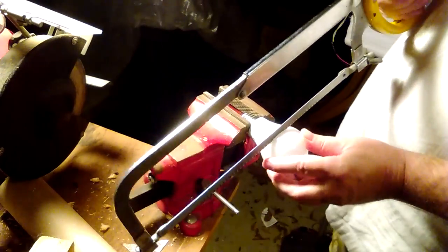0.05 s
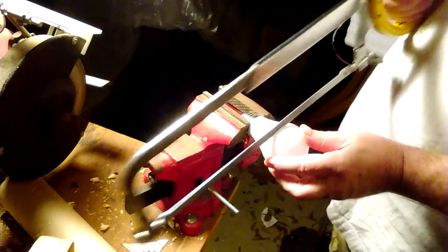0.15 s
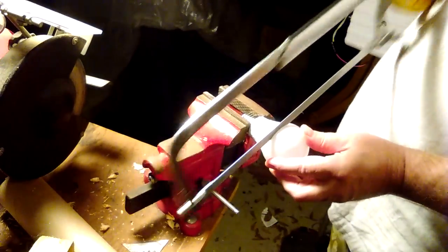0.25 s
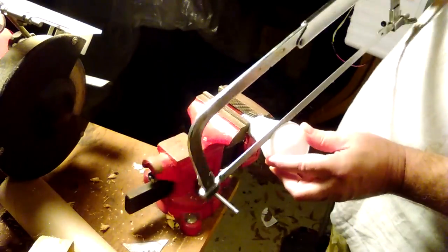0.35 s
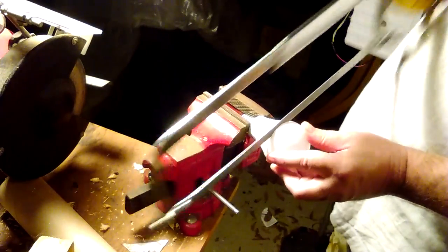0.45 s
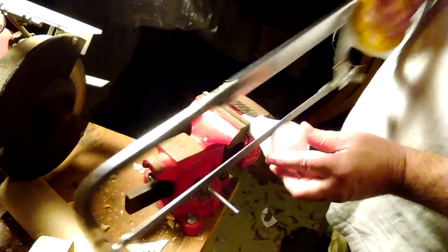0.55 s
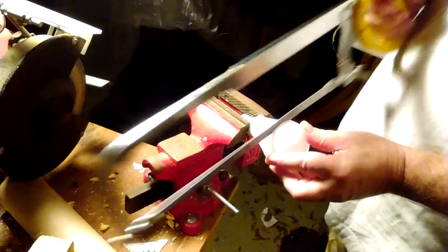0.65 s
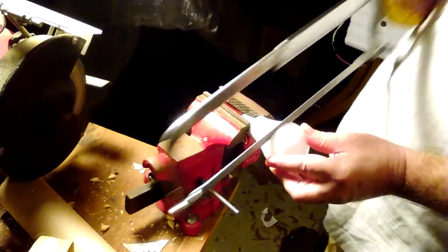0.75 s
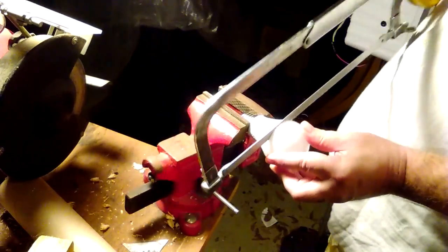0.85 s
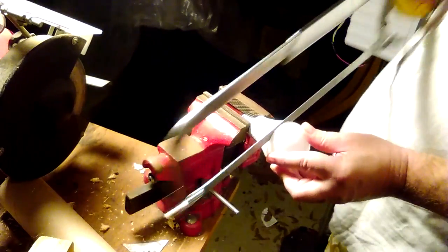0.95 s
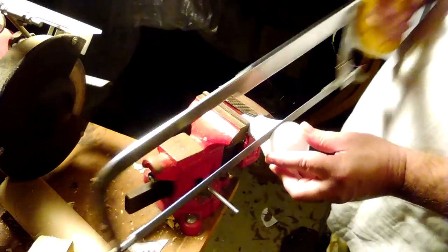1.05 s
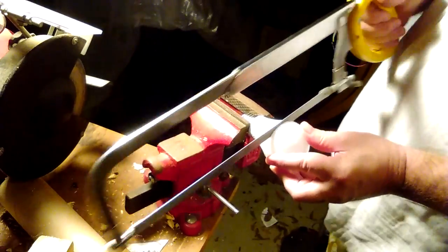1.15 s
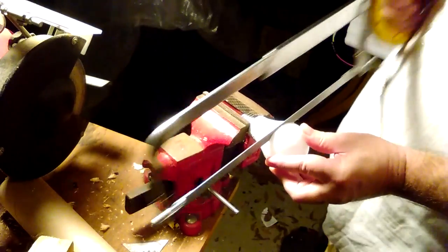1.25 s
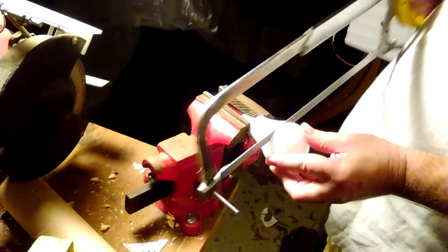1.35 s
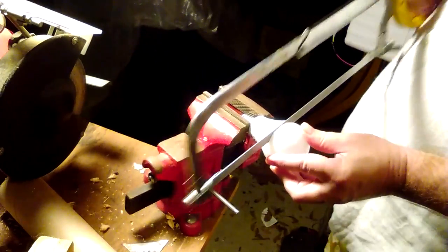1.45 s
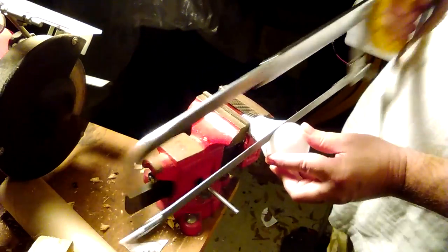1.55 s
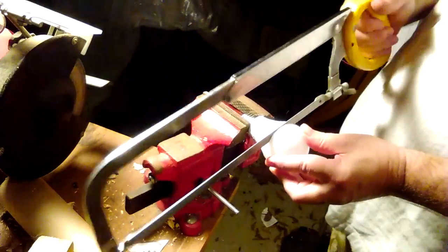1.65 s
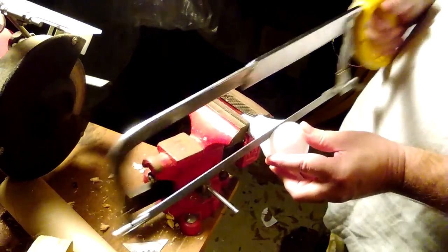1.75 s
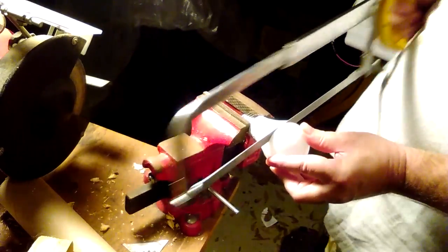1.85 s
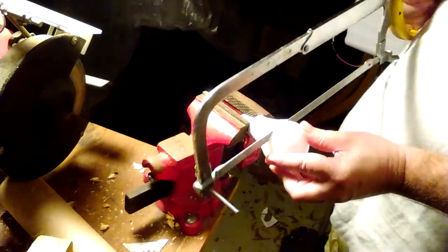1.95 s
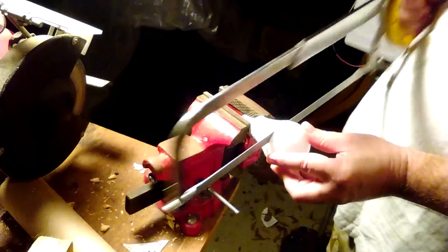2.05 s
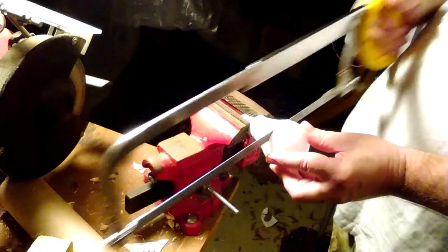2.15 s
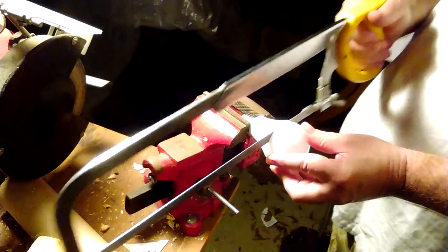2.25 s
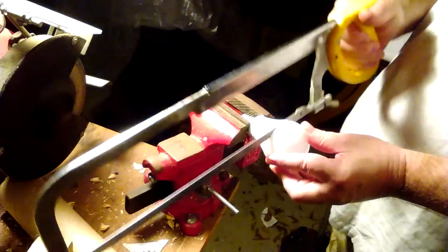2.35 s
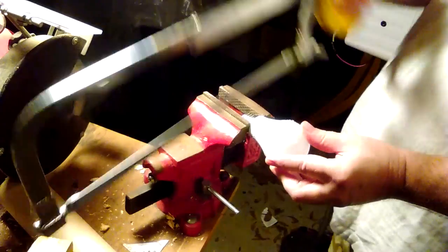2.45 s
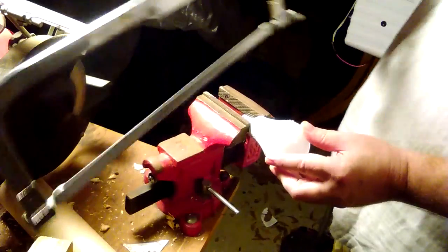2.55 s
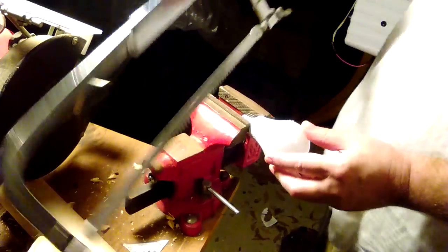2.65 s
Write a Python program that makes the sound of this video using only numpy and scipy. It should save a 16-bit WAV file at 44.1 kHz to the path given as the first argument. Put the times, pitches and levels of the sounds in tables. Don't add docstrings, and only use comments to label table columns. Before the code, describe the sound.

A hand hacksaw rasps back and forth through plastic in a vise, snags, then breaks free.

```python
import sys
import numpy as np
from scipy import signal
from scipy.fft import rfft, irfft, next_fast_len
from scipy.io import wavfile

SR = 44100
rng = np.random.default_rng(int(sys.argv[2]) if len(sys.argv) > 2 else 0)


def file_out(sig):
    cols = np.atleast_2d(sig).T
    lim = np.clip(cols, -1, 1)
    pcm = np.round(lim * 32767).astype(np.int16)
    wavfile.write(sys.argv[1], SR, pcm)


def volts_from_decibels(level):
    exponent = np.asarray(level, float) / 20
    return 10 ** exponent


N = 119070

# (frequency [Hz], level [dB])
HUM_SPECTRUM = [(12, -30), (20, -3), (72, 3.5), (147, -33), (235, -14.5), (865, -25), (6720, -27),
                (13800, -43), (15000, -68)]
HUM_DB, WHINE_HZ, WHINE_DB = -40, 1851, -60

# (time [s], peak [dB])
BENCH_THUDS = [(0.028, -41), (0.209, -52), (0.361, -15), (0.469, -17.5), (0.719, -22), (0.949, -13.5),
               (1.229, -19), (1.459, -17.5), (1.769, -13), (2.049, -14), (2.299, -20.5), (2.519, -43.5)]
THUD_S, THUD_CUT_HZ, SHAKE_DB = 0.051, 157, -36.5

# (start [s], blade hiss [dB], frame drive [dB], top tooth rate [Hz], drag left at turn [dB])
STROKES = [
    (.186, -12, -9.5, 520.3, -36.5),
    (0.426, -11, -17, 637.8, -19.5),
    (.662, -10.5, -11.5, 758, -21.5),
    (0.954, -10, -14, 882, -9.5),
    (1.195, -8, -13, 962, -28.5),
    (1.469, -9.5, -12.5, 706.2, -15.5),
    (1.752, -9, -15, 1078, -25),
    (1.975, -12, -16, 668.1, 2.5),
    (2.085, -8.5, -12.5, 679.4, -3),
    (2.295, -24.5, -20.5, 477.5, -6.5),
]
LAST_END_S, LAST_DRAG_DB = 2.40, -34.5
SPEED_SHAPE, SPEED_SKEW, HISS_SKEW = 0.6, 0.9, 0.74
HISS_POWER = 2.71
LOOSE_ABOVE_HZ, LOOSE_GAIN, SLOW_LOOSENESS = 750, 1.8, 1.5
TOOTH_JITTER, TOOTH_SPREAD_DB, RATE_WOBBLE = 0.095, 2.0, 0.045
CHIPS_PER_TOOTH, CHIP_SPREAD_DB, GATE_DEPTH, SURGE_DB = 4.0, 2, 0.39, 1.5

# (frequency [Hz], width [Hz], level [dB])
FRAME_MODES = [(188, 39, -8), (372, 38, -1.5), (415, 52, -4), (492, 30, 4), (594.3, 28, 2), (661, 34, 1.5),
               (723.5, 20.8, 0), (761, 10, -1), (971.4, 61, -6), (1088, 34, -6), (1257, 110, -10.5),
               (1589, 130, -14.5), (1860, 29, -11.5)]
# (frequency [Hz], width [Hz], level [dB])
BLADE_MODES = [(3300, 250, -19), (4063, 23.5, -2), (4672, 360, -2), (5130, 144, -1.5), (5230, 86, -12.5),
               (6010, 75, 2), (6603, 316, 4), (6637, 94, -2.5), (6840, 250, -3), (7290, 297, -3.5),
               (7740, 900, -12.5), (8260, 100, -17.5), (11340, 690, -30.5)]
BLADE_CUT_HZ, PATCH_DB = 10930, 3
# (frequency [Hz], level per Hz [dB])
RASP_SPECTRUM = [(470, -17), (800, 2), (2800, -9), (4700, -5.5), (5660, 3.5), (6570, -5), (9410, -29.5),
                 (13600, -26), (15400, -51)]
RASP_DB, RASP_FOLLOWS = -4.5, 0.31
# (time [s], peak [dB], decay length [s])
SNAGS = [(0.019, -27.5, 0.0036), (0.0316, -28.5, 0.0048), (0.067, -35, 0.0064), (.186, -31, 0.0026),
         (.191, -21.5, .003), (.201, -17, .004), (1.7472, -10, 0.0027), (1.96, -10, .002),
         (2.085, -10, .003), (2.281, -23, .003), (2.325, -13.5, 0.0035), (2.3504, -16, 0.0029),
         (2.409, -20, 0.006), (2.417, -27, 0.036), (2.624, -32, 0.0027), (2.6905, -51, 0.003)]
SNAG_TRIM_DB, SNAG_CUT_HZ, SNAG_FRAME_DB = 1, 10000, -8

# (frequency [Hz], level [dB], T60 [s])
PING_PARTIALS = [(6350, -12, 0.34), (6826, 0, 0.095), (7830, -2.5, 0.11), (7908, -23.5, 0.12),
                 (8370, -3, 0.087), (8500, -13, 0.047)]
PING_S, PING_DB, PING_RISE_S = 2.3675, -14, 0.0019

# (frequency [Hz], width [Hz], level [dB])
FREED_MODES = [(1390, 420, -2), (1830, 180, -4), (3340, 29, -4), (3830, 69, -6), (4400, 1170, 2.5),
               (5270, 410, 5), (6200, 1430, 5), (7750, 730, 5.5), (10930, 1400, -42)]
BREAK_S, BREAK_LENGTH_S, BREAK_DB = 2.431, 0.011, -9
BREAK_TAIL_DB, BREAK_T60_S = -17, 0.31
# (frequency [Hz], level [dB], T60 [s])
AFTER_PARTIALS = [(3580, -41, .9), (4020, -43, .6), (1990, -46, .7), (7700, -40, .4), (4500, -44, .5)]

GARAGE_T60_S, WET_DB, WALL_CUT_HZ = 0.38, -21, 5300

LIMIT_DB, LIMIT_SHARE, LIMIT_S = -7.5, 0.74, 0.018
CUTOFF_HZ, CEILING, KNEE = 14000, 1.0, 18
# (frequency [Hz], share of cells replaced [0-1])
TREBLE_FILL = [(4000, 0.0072), (5000, .06), (6500, 0.3), (8000, .55), (11000, 0.47), (13500, 0.68),
               (14200, 0.29)]
FILL_BAND_HZ, STEADY_DB, TONAL_CREST = 700, 6, 9
TOP_HZ, TOP_SHARE, TOP_DB = 14300, 0.25, -18


def rms_one(x):
    return x / np.sqrt(np.mean(x ** 2) + 1e-20)


def drift(rate_hz):
    r = np.exp(-2 * np.pi * rate_hz / SR)
    return rms_one(signal.lfilter([1], [1, -2 * r, r * r], rng.standard_normal(N + SR))[SR:])


def lowpass(x, order, cut_hz):
    return signal.sosfilt(signal.butter(order, cut_hz, fs=SR, output="sos"), x)


def coloured(x, spectrum):
    hz, db = np.transpose(spectrum)
    f = np.maximum(np.fft.rfftfreq(N, 1 / SR), 1)
    return irfft(rfft(x) * volts_from_decibels(np.interp(np.log(f), np.log(hz), db)), N)


def resonances(x, modes, patch_db=0):
    out, signs = 0, rng.choice([-1, 1], (3, N))
    for k, (hz, width_hz, db) in enumerate(modes):
        r = np.exp(-np.pi * width_hz / SR)
        if patch_db:
            gain = signs[k % 3] * volts_from_decibels(db + patch_db * drift(8.4))
        else:
            gain = (-1) ** k * volts_from_decibels(db)
        b = [(1 - r * r) / 2, 0, (r * r - 1) / 2]
        a = [1, -2 * r * np.cos(2 * np.pi * hz / SR), r * r]
        out = out + signal.lfilter(b, a, gain * x + 1e-18)
    return out


def struck(x, modes, patch_db=0):
    return resonances(x, modes, patch_db) / np.std(resonances(rng.standard_normal(N), modes))


def burst(start_s, db, length_s):
    t = np.arange(N) / SR - start_s
    return volts_from_decibels(db) * (t >= 0) * np.exp(-np.maximum(t, 0) / length_s)


def partials(start_s, table, flutter_db, flutter_hz):
    t = np.maximum(np.arange(N) / SR - start_s, 0)
    out = 0
    for hz, db, t60_s in table:
        level_db = db - 60 * t / t60_s + flutter_db * drift(flutter_hz)
        out = out + volts_from_decibels(level_db) * np.sin(2 * np.pi * hz * t)
    return out


def hum():
    whine = rms_one(resonances(rng.standard_normal(N), [(WHINE_HZ, 12, 0)]))
    return volts_from_decibels(HUM_DB) * rms_one(coloured(rng.standard_normal(N), HUM_SPECTRUM)) + volts_from_decibels(WHINE_DB) * whine


def bench():
    t = np.arange(N) / SR
    lumps = sum(volts_from_decibels(db - 10.5) * np.exp(-((t - s) / THUD_S) ** 2) for s, db in BENCH_THUDS)
    band = signal.butter(2, [30, THUD_CUT_HZ], "band", fs=SR, output="sos")
    low = signal.sosfilt(band, rng.standard_normal(N + SR))[SR:]
    return (volts_from_decibels(SHAKE_DB) + lumps) * rms_one(low)


def snag_noise():
    return rng.standard_normal(N) * volts_from_decibels(SNAG_TRIM_DB) * sum(burst(*row) for row in SNAGS)


def motion():
    t, out = np.arange(N) / SR, np.zeros((4, N))
    following = [*STROKES[1:], (LAST_END_S, 0, 0, 0, LAST_DRAG_DB)]
    for (start_s, hiss_db, drive_db, tooth_hz, drag_db), (end_s, *_, next_db) in zip(STROKES, following):
        u = np.clip((t - start_s) / (end_s - start_s), 0, 1)
        speed = np.abs(np.sin(np.pi * u ** SPEED_SKEW)) ** SPEED_SHAPE
        rub = np.abs(np.sin(np.pi * u ** HISS_SKEW)) ** SPEED_SHAPE
        rest = np.minimum(volts_from_decibels(drag_db + (next_db - drag_db) * u), 1)
        moving = rest + (1 - rest) * speed
        loose = (LOOSE_GAIN if tooth_hz > LOOSE_ABOVE_HZ else 1) * (1 + SLOW_LOOSENESS * (1 - speed))
        hiss = volts_from_decibels(hiss_db) * (rest + (1 - rest) * rub ** HISS_POWER)
        stroke = np.array([tooth_hz * moving, loose, hiss, volts_from_decibels(drive_db) * moving])
        out += (t >= start_s) * (t < end_s) * stroke
    return out


def frame_ring(phase, loose, drive):
    tooth = np.diff(np.floor(np.maximum.accumulate(phase)), prepend=0) > 0
    bites = tooth * volts_from_decibels(TOOTH_SPREAD_DB * loose * np.clip(rng.standard_normal(N), -3, 1.5))
    ring = resonances(bites * drive * volts_from_decibels(SURGE_DB * drift(28.5)), FRAME_MODES)
    return rms_one(ring) * np.sqrt(np.mean(drive ** 2))


def chip_push(phase, rate_hz, hiss):
    sizes = volts_from_decibels(CHIP_SPREAD_DB * np.minimum(rng.exponential(1, N), 5)) * rng.choice([-1, 1], N)
    hits = rng.random(N) < CHIPS_PER_TOOTH * (rate_hz + 300) / SR
    chips = rms_one(sizes * hits) / np.sqrt(rate_hz / 700 + 0.34)
    gate = 1 + GATE_DEPTH * np.cos(2 * np.pi * phase)
    return chips * hiss * gate * volts_from_decibels(SURGE_DB * drift(26.7))


def friction_rasp(push, hiss, drive):
    follow = np.where(hiss > 0, (drive + 1e-9) / (hiss + 1e-9), 1) ** RASP_FOLLOWS
    unit = np.std(coloured(rng.standard_normal(N), RASP_SPECTRUM))
    return volts_from_decibels(RASP_DB) * coloured(push * follow, RASP_SPECTRUM) / unit


def saw():
    snags = snag_noise()
    rate_hz, loose, hiss, drive = motion()
    cycles = np.cumsum(rate_hz * (1 + RATE_WOBBLE * loose * drift(25))) / SR
    phase = cycles + TOOTH_JITTER * loose * drift(300)
    push = chip_push(phase, rate_hz, hiss) + lowpass(snags, 2, SNAG_CUT_HZ)
    blade = lowpass(struck(push, BLADE_MODES, PATCH_DB), 2, BLADE_CUT_HZ)
    knock = volts_from_decibels(SNAG_FRAME_DB) * struck(snags, FRAME_MODES)
    return frame_ring(phase, loose, drive) + blade + friction_rasp(push, hiss, drive) + knock


def ping():
    t = np.maximum(np.arange(N) / SR - PING_S, 0)
    rise = 1 - np.exp(-(t / PING_RISE_S) ** 2)
    return rise * volts_from_decibels(PING_DB) * partials(PING_S, PING_PARTIALS, 3.0, 60)


def break_free():
    t = np.arange(N) / SR - BREAK_S
    rattle = volts_from_decibels(BREAK_DB) * (t > 0) * (t < BREAK_LENGTH_S) * np.clip(t / 0.0025, 0.3, 1)
    tail = burst(BREAK_S, BREAK_TAIL_DB, BREAK_T60_S / np.log(1000))
    return struck(rng.standard_normal(N) * (rattle + tail), FREED_MODES)


def after_ring():
    return partials(BREAK_S, AFTER_PARTIALS, 4.6, 30)


def garage(x):
    size = next_fast_len(N + SR)
    w = 2 * np.pi * np.fft.rfftfreq(size)
    dull = 1 / (1 + 1j * w * SR / (2 * np.pi * WALL_CUT_HZ))
    out = 0
    for k, lag in enumerate((rng.uniform(0.012, 0.04, 10) * SR).astype(int)):
        loop = volts_from_decibels(-60 * lag / SR / GARAGE_T60_S) * dull ** 0.5 * np.exp(-1j * w * lag)
        out = out + (-1) ** k * loop / (1 - loop)
    return irfft(rfft(x, size) * out, size)[:N]


def scene():
    near = saw() + ping() + break_free() + after_ring()
    mono = near + volts_from_decibels(WET_DB) * garage(near) + bench() + hum()
    return np.array([mono, mono])


def levelled(x):
    r = np.exp(-1 / (LIMIT_S * SR))
    level_db = 10 * np.log10(signal.lfilter([1 - r], [1, -r], x[0] ** 2) + 1e-12)
    return x * volts_from_decibels(-LIMIT_SHARE * np.maximum(level_db - LIMIT_DB, 0))


def noise_fill(x):
    hz, _, z = signal.stft(x, SR, "cosine", nperseg=2048)
    band, frames = (hz // FILL_BAND_HZ).astype(int), z.shape[2]
    bands = band.max() + 1

    chance = rng.random((band.max() // 2 + 1, frames // 2 + 1))[band // 2][:, np.arange(frames) // 2]
    chance = np.where(rng.random((bands, frames))[band] < 0.25, 1, chance)
    filled = chance < np.interp(hz, *np.transpose(TREBLE_FILL))[:, None]

    cell = np.abs(z[0]) ** 2
    power = np.array([np.mean(cell[band == b], axis=0) for b in range(bands)])[band]
    crest = np.array([np.max(cell[band == b], axis=0) for b in range(bands)])[band]
    filled &= crest < TONAL_CREST * power
    level_db = 10 * np.log10(power[hz > 4000].sum(axis=0) + 1e-20)
    step_db = np.abs(np.gradient(level_db))
    filled &= np.maximum(step_db, np.roll(step_db, 1)) < STEADY_DB

    noise = signal.stft(rng.standard_normal(x.shape), SR, "cosine", nperseg=2048)[2]
    z = np.where(filled, np.sqrt(power) * noise / np.sqrt(np.mean(np.abs(noise) ** 2)), z)
    loud = power[hz > TOP_HZ].sum(axis=0)
    z[:, hz > TOP_HZ] *= volts_from_decibels(TOP_DB) * (loud > np.quantile(loud, 1 - TOP_SHARE))
    return signal.istft(z, SR, "cosine", nperseg=2048)[1][:, :N]


def top_cut(x):
    return signal.sosfilt(signal.butter(12, 15600, fs=SR, output="sos"), x)


def record(dry):
    x = lowpass(levelled(dry), 8, CUTOFF_HZ)
    squeezed = x / (1 + np.abs(x / CEILING) ** KNEE) ** (1 / KNEE)
    mix = np.clip(noise_fill(squeezed), -CEILING, CEILING)
    return top_cut(mix)


dry = scene()
out = record(dry)
file_out(out)
```